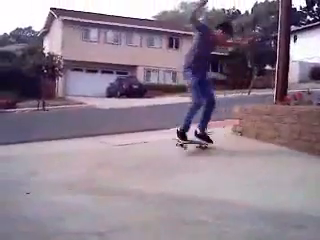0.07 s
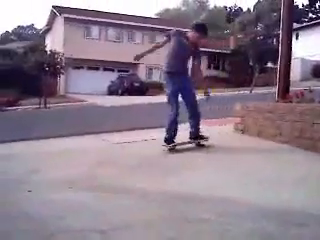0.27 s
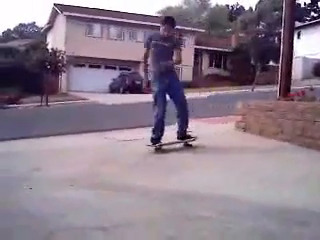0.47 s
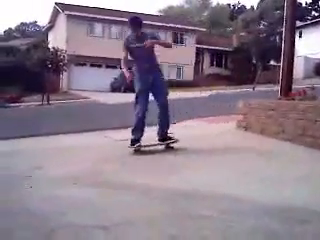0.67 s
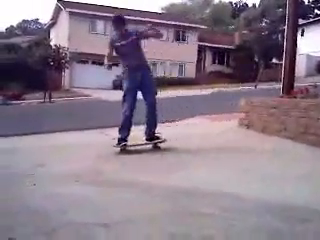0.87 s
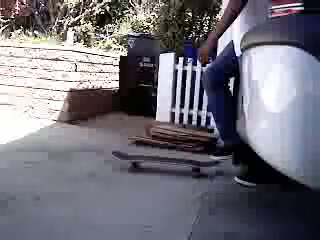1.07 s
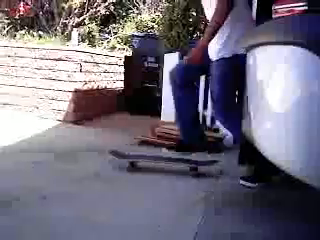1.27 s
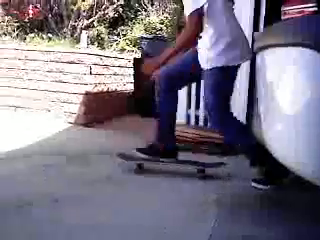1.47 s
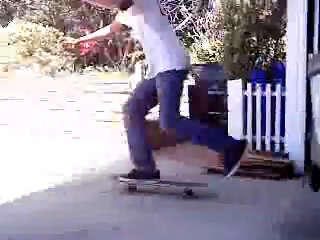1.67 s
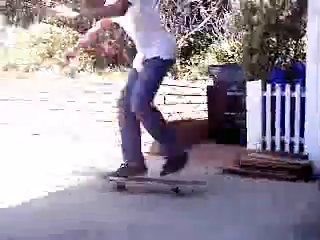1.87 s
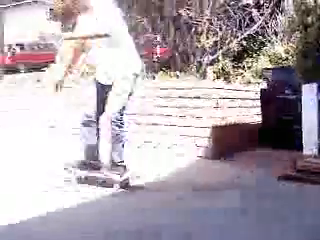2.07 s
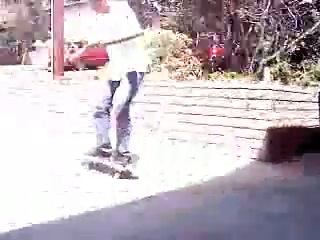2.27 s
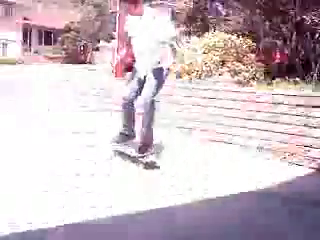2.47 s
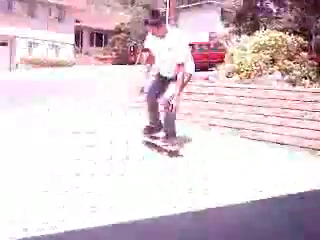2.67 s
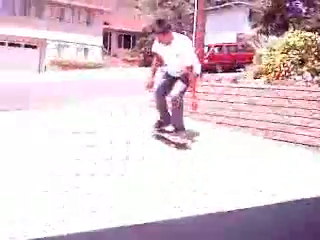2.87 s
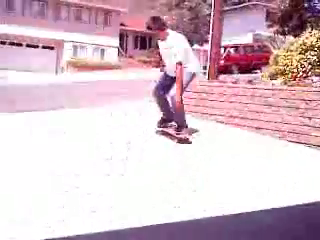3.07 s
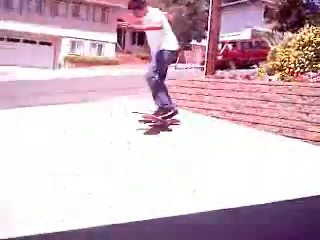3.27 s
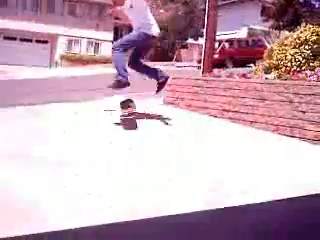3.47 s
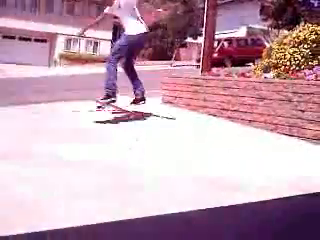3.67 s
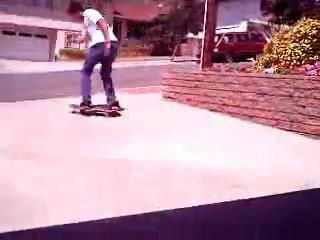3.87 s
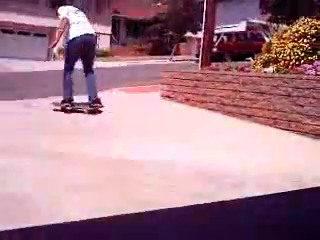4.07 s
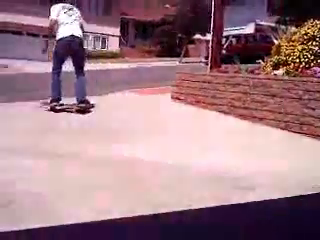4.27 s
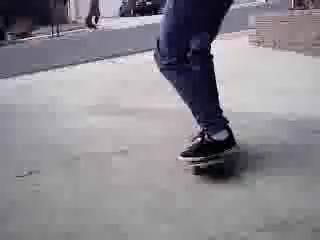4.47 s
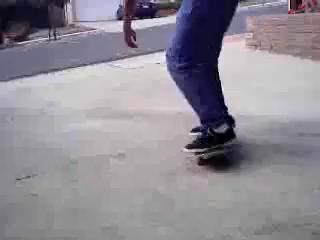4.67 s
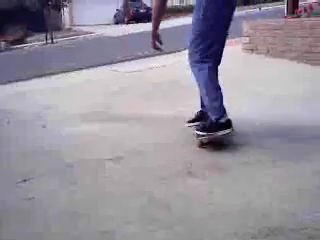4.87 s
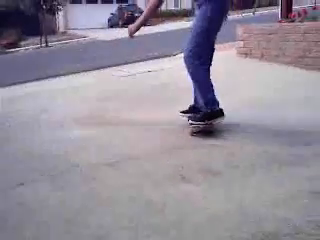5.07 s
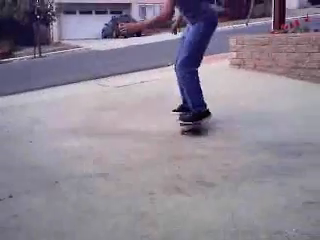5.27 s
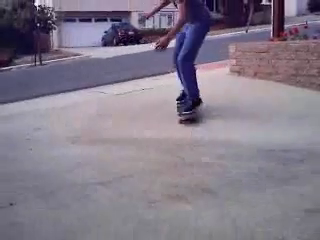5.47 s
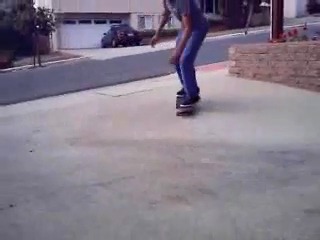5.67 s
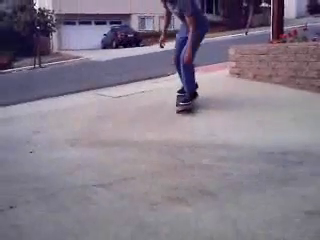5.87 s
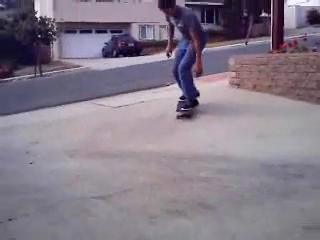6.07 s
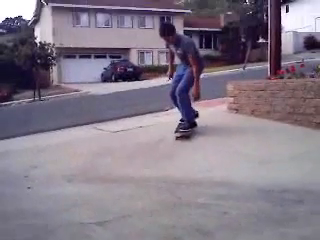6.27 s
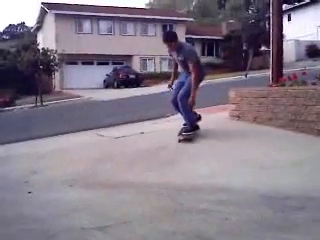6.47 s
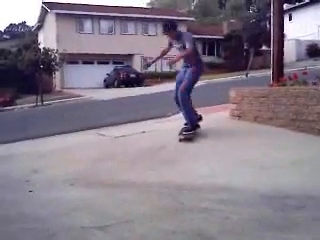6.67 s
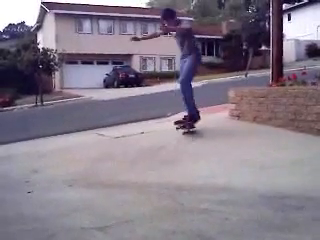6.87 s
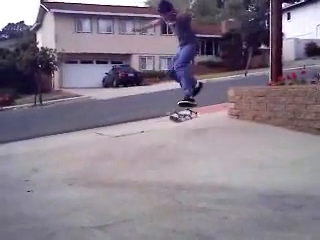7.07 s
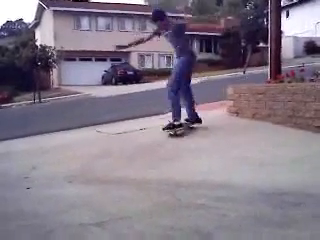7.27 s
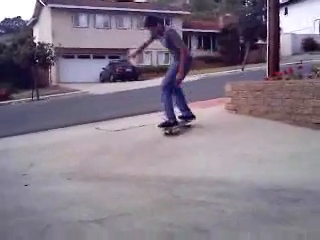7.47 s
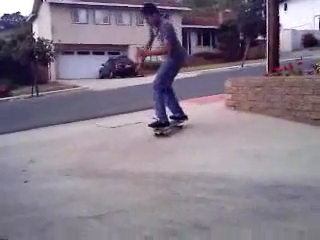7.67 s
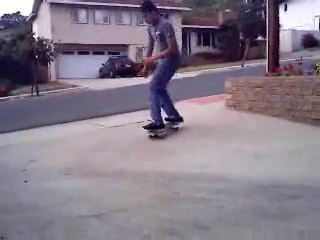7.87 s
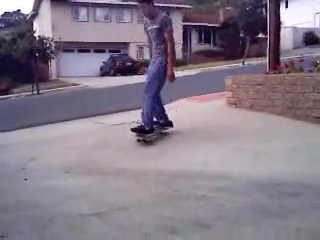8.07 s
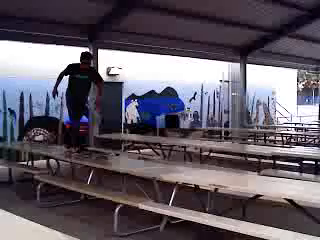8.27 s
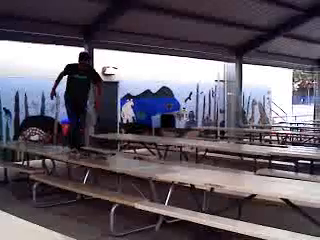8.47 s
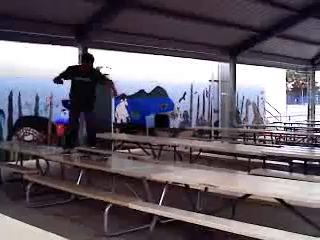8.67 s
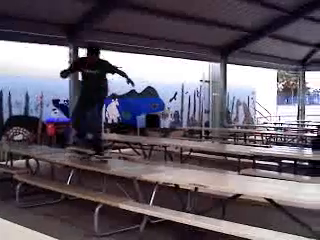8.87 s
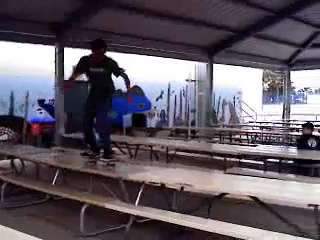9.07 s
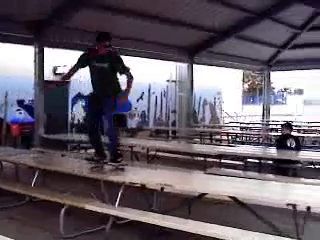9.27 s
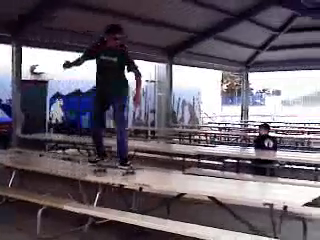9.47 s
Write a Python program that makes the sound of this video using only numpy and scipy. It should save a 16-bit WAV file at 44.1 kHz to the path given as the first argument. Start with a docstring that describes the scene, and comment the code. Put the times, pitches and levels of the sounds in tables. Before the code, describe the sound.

Hollow wooden skateboard clacks punctuate gritty wheel rumble outdoors; a shoe chirps once, wind buffets, and the sound freezes and stutters three times.

```python
"""Skateboards roll, pop and land on concrete drives and on a table top.
Grit under the wheels is random excitation that drives the resonances of deck, wheels and trucks.
Blows and scuffs ring those resonances as dying bursts; a shoe chirps and hisses on the grip tape.
A lumpy breeze lies behind, and peaks overload a narrow-band channel.
Three times the sound nearly stops, then stutters: one short passage starts over several times."""
import sys
import numpy as np
from scipy.fft import rfft, irfft, next_fast_len
from scipy.io import wavfile
from scipy.ndimage import uniform_filter1d, map_coordinates

SR = 44100
rng = np.random.default_rng(int(sys.argv[2]) if len(sys.argv) > 2 else 0)


def waveform_to_disk(signal):
    """Save audio, clipped to [-1, 1], as 16-bit WAV at the path in sys.argv[1]."""
    frames = np.transpose(np.atleast_2d(signal))
    scaled = np.clip(frames, -1, 1) * 32767
    samples = np.round(scaled).astype(np.int16)
    wavfile.write(sys.argv[1], SR, samples)


N = 419391


def amp(db):
    """Decibel law: level to amplitude ratio."""
    return 10 ** (np.asarray(db) / 20)


def unit(x):
    """Normalisation to a root-mean-square of one."""
    return x / np.sqrt(np.mean(x ** 2) + 1e-20)


def curves(rows):
    """Linear interpolation: one value per sample for each column after the time."""
    s, *columns = np.transpose(rows)
    return [np.interp(np.arange(N) / SR, s, column) for column in columns]


def wobble(rate):
    """Slow random modulation: a smooth curve through `rate` random knots a second."""
    knots = rng.standard_normal(int(N * rate / SR) + 4)
    return map_coordinates(knots, [np.arange(N) * rate / SR])


def swells(rows):
    """Gaussian envelopes, summed, from rows of (t/s, peak level/dB, half length/s)."""
    t = np.arange(N) / SR
    return sum(amp(db) * np.exp(-((t - s) / half) ** 2 / 2) for s, db, half in rows)


def filtered(x, response):
    """Linear filtering: the spectrum of x times a response that is a function of frequency."""
    m = next_fast_len(len(x) + 8192)  # padding leaves room for the ringing
    return irfft(rfft(x, m) * response(np.fft.rfftfreq(m, 1 / SR)), m)[:len(x)]


def colour(points):
    """Spectral shaping: gain through (f/Hz, level/dB) points on a logarithmic axis."""
    hz, db = np.transpose(points)
    return lambda f: amp(np.interp(np.log(f + 1), np.log(hz + 1), db))


# rolling levels over time; lists break at contacts, splices and sudden changes of level:
# t/s, wheels level/dB, then levels over the wheels: drone level/dB, deck level/dB, trucks level/dB
ROLLING_LEVELS = [
    [(0.0, -35.5, -4, -3, -6), (0.064, -38, 2, -1, -10), (0.13, -39, -4, -3, -7)],
    [(0.32, -36.5, -2.5, -1, -4.5), (0.432, -44, -1.5, -3.5, -2.5), (0.692, -37, -2, -1, -3.5),
     (1.026, -34, -6.5, -6.5, -3), (1.05, -44, -17, 8, 4)],
    [(1.07, -37, -8, -19, -3), (1.228, -36, -2.5, -3, -5.5), (1.535, -37, -3, -5.5, -3.5)],
    [(1.57, -27, -2, -2, -2.5), (1.612, -25.5, -9, -3, 4.5), (1.666, -24, 1.5, 4, -5.5),
     (1.864, -21.5, -1.5, -1.5, -4.5), (1.97, -17.5, -12, -11, 2.5)],
    [(1.99, -22, -26, 1, -17), (2.012, -12.5, -8, -2, -0.5), (2.04, -14, -9.5, 1.5, -4),
     (2.064, -14, -2.5, 1, -6), (2.12, -20.5, -3, 5, -7.5), (2.18, -20, -1.5, 6, -4.5),
     (2.225, -20.5, -7, 9, 0), (2.276, -18.5, -8.5, 3.5, -2.5), (2.36, -23, 0.5, 3, -1.5),
     (2.405, -17.5, 0, 3, -6), (2.44, -23.5, 5, 5.5, -1.5), (2.478, -25, 4, 6.5, -7.5),
     (2.52, -26, -9, 5, 1), (2.56, -27.5, -11, -12, 6.5), (2.668, -21.5, -5, 1.5, -1),
     (2.776, -28, 2.5, 1, -4.5), (2.826, -21, 3.5, -5, -7.5), (2.858, -26.5, 4.5, 1, -6.5),
     (3.0, -30, 6, 2, -4), (3.07, -31, 7.5, 1.5, -3.5), (3.23, -34, 4, 1, -4.5), (3.33, -38.5, 4.5, -2, -4)],
    [(3.57, -34, -3, -2.5, -5), (3.658, -35.5, -1, -5, -6.5), (3.68, -34.5, -17, -13, -6)],
    [(3.95, -36.5, -5, -4, -3.5), (3.978, -43.5, -2, -1, -6), (4.194, -42.5, 6, 1, -6),
     (4.276, -33, 2.5, 1.5, -4.5), (4.51, -44.5, 3.5, 7, -4)],
    [(4.644, -16.5, -17, -5, 0), (4.668, -19.5, -20, -11, 1.5), (4.69, -14.5, -8, -15, -5)],
    [(4.71, -18.5, -4.5, -16, -1), (4.77, -21, -6, -1, -3.5), (4.82, -22.5, 0, -4, -7),
     (4.84, -24.5, 6.5, 2.5, -1.5), (4.95, -18.5, -7, -5.5, -5.5), (5.0, -22, 1, -0.5, -6),
     (5.05, -22, 1.5, 7.5, -5), (5.11, -24, -5, 2, -4), (5.17, -17.5, -3, -6, -7),
     (5.34, -25.5, 2, 5.5, -9), (5.51, -21.5, -14, -1.5, -11.5), (5.57, -27, 3, 2.5, -5.5),
     (5.61, -23, -13, -10, -2.5), (5.83, -28.5, 3.5, -0.5, -9), (6.0, -37.5, 2, -5, -3.5),
     (6.21, -31.5, 2.5, -5, -4.5), (6.4, -37, 3.5, -8.5, -9), (6.75, -36, -4.5, -3.5, -8.5),
     (6.78, -38.5, 1.5, -9, -9.5), (7.0, -36.5, -2, -1, 0.5)],
    [(7.12, -33, -6, -8, -7), (7.214, -44, 4, -5, -1), (7.24, -39, -1, 10, -3)],
    [(7.48, -43, -0.5, 0, -1), (7.662, -45, -6.5, -7, -5.5), (8.012, -38.5, 7, -3, -8),
     (8.12, -33.5, 0.5, -3, -4), (8.222, -37, -12, -10, -4.5), (8.29, -38, -3, -3, -4)],
    [(8.37, -40.5, -3, 7.5, -2.5), (8.68, -33, 4.5, 5.5, -8.5), (8.762, -34, -2, 6, -3.5),
     (8.788, -33, 0, 8, -7), (8.915, -34, 2, 4, -4), (8.93, -26, -2, 1, -3.5), (8.964, -21.5, -5, 1, -6),
     (9.004, -27, 5, 6, 0), (9.056, -23.5, -4, 3, -7), (9.12, -22, 3.5, 2.5, -6.5),
     (9.156, -18.5, 1.5, 1, -4), (9.2, -19, 5, 5, -5), (9.25, -21.5, 0, 1.5, -4.5),
     (9.36, -21, 0, 1.5, -6.5), (9.39, -21.5, 1, 10, -7), (9.5, -20.5, -1, -1, -7.5)],
]
# slowest bending of the plywood: f/Hz, width/Hz, relative level/dB
DRONE_MODES = [(141.6, 42.5, -7), (206.7, 49.6, 1.5), (218.7, 38.2, 0)]
# bending of the plywood: f/Hz, width/Hz, relative level/dB
DECK_MODES = [(262, 57.3, -3), (327.8, 39, 0), (385.3, 14, -2), (425.6, 38, -6)]
# wheels and short deck modes: f/Hz, width/Hz, relative level/dB
WHEEL_MODES = [(495.3, 52, -0.5), (557.8, 28, 3), (641.4, 51, 0), (755.6, 51.6, 0), (837, 75.6, -2),
               (963, 68, -4)]
# axles and bolts: f/Hz, width/Hz, relative level/dB
TRUCK_MODES = [(1053.4, 56.4, 3.5), (1314, 236, -1.5), (1431, 49.5, 5.5), (1540, 290, -4), (1750, 68, -1.5),
               (1822, 140, -7.5)]


def rolling():
    """Forced vibration: one stream of grit drives drone, deck, wheels and trucks."""
    wheels_db, drone_db, deck_db, trucks_db = curves(np.concatenate(ROLLING_LEVELS))
    stones = grit(6000, spread_db=0.55) * amp(0.88 * wobble(25))
    parts = [(drone_db, DRONE_MODES), (deck_db, DECK_MODES), (0, WHEEL_MODES), (trucks_db, TRUCK_MODES)]
    board = 0
    for over_wheels_db, table in parts:
        level = amp(wheels_db + over_wheels_db + 0.44 * wobble(12))
        board = board + level * swaying(stones, table)
    return board + surface_hiss(stones, wheels_db + trucks_db)


def grit(rate, spread_db):
    """Impulse noise: stones push at random, `rate` a second, with very unequal strength."""
    chance, size, push = rng.random(N), rng.exponential(size=N), rng.standard_normal(N)
    return (chance < rate / SR) * amp(spread_db * size) * push


SWAY_DB, SWAY_RATE = .7, 10  # depth of the sway; random knots a second


def swaying(stones, table):
    """Modal superposition: each mode swells a little on its own as the load shifts."""
    total = 0
    for k, mode in enumerate(table):
        ring = filtered(stones, modes([mode]))
        total = total + (-1) ** k * amp(SWAY_DB * wobble(SWAY_RATE)) * ring
    return unit(total)


WOODY_HZ = 2120  # above this the board radiates little


def modes(table):
    """Damped resonance: the causal response of a set of modes, weakened above WOODY_HZ."""
    def response(f):
        total = 0
        for k, (centre, width, db) in enumerate(table):
            resonance = 1j * f * width / (centre * centre - f * f + 1j * f * width)
            total = total + (-1) ** k * amp(db) * resonance  # alternating phase
        return total / (1 - (f / WOODY_HZ) ** 2 + 1.2j * f / WOODY_HZ)
    return response


# colour of the hiss of grit, also used for the crack of a contact: f/Hz, relative level/dB
GRIT_COLOUR = [(1200, -33.5), (1900, -3), (2400, -1.5), (3000, -0.5), (3800, -3), (6000, -37)]
# a shoe hisses along the grip tape: t/s, peak level/dB, half length/s
SHOE_DRAGS = [(1.565, -31, 0.013), (3.345, -35.5, 0.0036), (3.501, -27, 0.013), (6.95, -43, 0.052),
              (7.1, -49, 0.022)]
HISS_DB, STREET_DB = -15.5, -53  # grit hiss relative to the trucks; steady hiss of the street


def surface_hiss(stones, rattle_db):
    """Friction noise: hiss that follows the rattle of the trucks, over a steady street hiss."""
    hiss = unit(filtered(stones + 0.26 * rng.standard_normal(N), colour(GRIT_COLOUR)))
    level = np.hypot(amp(rattle_db + HISS_DB), amp(STREET_DB))  # powers add
    return (level + swells(SHOE_DRAGS)) * hiss


# blows on the board: t/s, relative level/dB, strongest ring f/Hz, sharpness level/dB, t60/s
BOARD_BLOWS = [(.172, 4.5, 908, -5, 0.011), (.178, -4.5, 530, -4, 0.013), (.183, -16, 645, 13, 0.015),
               (.211, -4, 1030, -10, 0.036), (.2205, -3.5, 1410, 2.5, 0.018), (.228, -14, 780, 6, 0.033),
               (.237, -4.5, 640, -4, 0.037), (1.979, -10, 1410, 1.5, 0.075), (1.988, -5.5, 733, 3, 0.097),
               (1.996, -14, 1420, 5, 0.037), (2.644, -7, 344, 1.5, 0.058), (2.60, -15.5, 1390, 3, 0.05),
               (2.696, -10.5, 1187, 6.5, 0.018), (3.494, -10, 330, -6, 0.059), (3.501, -13, 330, -3, 0.069),
               (3.7065, -0.5, 290, -0.5, 0.018), (3.715, 1, 930, -12, 0.058), (3.765, -10, 786, -7, 0.097),
               (3.7935, -0.5, 776, 0, 0.05), (3.813, -4, 284, -17, 0.02), (3.8675, -0.5, 643, -7, 0.025),
               (3.876, -8, 265, 0, 0.0078), (4.401, -17.5, 287, -7.5, 0.094), (4.475, -13, 510, -6, 0.018),
               (4.484, -20, 624, 8, 0.022), (4.670, -4, 1080, 1.5, 0.024), (4.677, -11, 298, -12, 0.05),
               (4.686, -6.5, 520, -1.5, .03), (4.708, -21, 1450, 11, 0.022), (4.699, -15, 288, 3, 0.036),
               (4.777, -7.5, 840, -0.5, 0.035), (4.930, -8.5, 860, -8.5, 0.032),
               (5.189, -9, 558, -11, 0.047), (5.591, -19, 900, 3.5, 0.037), (5.605, -15, 665, 1.5, .04),
               (7.026, -16.5, 890, -5, 0.0074), (7.038, -6.5, 1480, 8.5, 0.039),
               (7.047, -18, 803, 9, 0.078), (7.057, -19.5, 316, 0, 0.065), (7.329, 7, 565, -8.5, 0.039),
               (7.352, -8, 554, -0.5, 0.038), (7.358, -5, 554, -12.5, 0.064), (7.37, -14, 554, -10, .05),
               (7.385, -12.5, 640, -2, .03), (7.3915, -4, 264, -3, 0.025), (7.393, -4.5, 554, -1, .03),
               (7.398, -4.5, 550, -6.5, 0.022), (7.408, -9.5, 552, -16, 0.019),
               (8.320, -12.5, 267, -4.5, 0.056), (8.461, -28, 420, -22, 0.02),
               (8.466, -25.5, 450, -10, 0.017), (8.795, -28, 584, -10.5, 0.032),
               (8.926, -25, 574, -6, 0.063), (9.216, -4.5, 515, -37, 0.064), (9.317, -8, 328, -12, 0.093)]
# shoe, tail or wheel scuffing just before or between blows:
# t/s, relative level/dB, strongest ring f/Hz, sharpness level/dB, t60/s
BOARD_SCUFFS = [(.154, -12, 570, -3, 0.11), (.204, -11, 1110, 5, 0.022), (1.245, -33.5, 1144, 13, 0.18),
                (1.542, -20.5, 1180, 2, 0.071), (3.356, -22, 1310, 3, 0.36), (3.484, -23, 328, -9, 0.1),
                (4.6445, -18.5, 1550, 9, 0.12), (4.654, -19.5, 1720, 8, .15), (4.662, -22, 1420, 10, 0.11),
                (7.025, -11.5, 470, 1.5, 0.016), (7.251, -16.5, 1520, -2.5, 0.21),
                (7.272, -21, 520, 0, 0.17), (8.309, -16, 1430, -0.5, 0.089)]


def blows():
    """Impact excitation: hard contacts start with a strike; scuffs start with a weaker one."""
    return contacts(BOARD_BLOWS, strike=13.2) + contacts(BOARD_SCUFFS, strike=7.6)


CRACK_DB, CRACK_GROWS = -12.5, 0.67  # share of the crack; dB gained per dB of sharpness
DECK_DB, WHEELS_DB = -7, 0  # shares in a contact on the wheels
FLAT_DB, FLAT_WHEELS_DB = 3, -4.5  # deck and wheel shares when the deck falls flat


def contacts(table, strike):
    """Free decay: a first touch and a dying rattle ring the modes, beside a crack of noise."""
    out, t = np.zeros(N + SR), np.arange(SR // 4) / SR
    for s, db, ring_hz, sharp_db, t60 in table:
        flat = ring_hz < 400  # a flat fall rings low
        deck_db, wheels_db = (FLAT_DB, FLAT_WHEELS_DB) if flat else (DECK_DB, WHEELS_DB)
        crack_db = CRACK_DB + CRACK_GROWS * sharp_db
        # loose parts and nearby walls leave a weaker, longer tail
        dying = amp(-60 * t / t60) + amp(-13.5 - 60 * t / 0.2)
        noise = rng.standard_normal(len(t))
        push = dying * noise
        push[0] += strike
        parts = [(DRONE_MODES + DECK_MODES, deck_db), (WHEEL_MODES, wheels_db), (TRUCK_MODES, sharp_db)]
        rings = [(filtered(push, modes(struck(modal, ring_hz))), share_db) for modal, share_db in parts]
        crack = (dying + 1.2 * amp(-60 * t / 0.0097)) * filtered(noise, colour(GRIT_COLOUR))
        rings.append((crack, crack_db))
        sound = sum(amp(db + share_db - 8.0) * ring / loudest(ring) for ring, share_db in rings)
        out[round(s * SR):][:len(t)] += sound
    return out[:N]


def struck(modal, ring_hz):
    """Modal participation: the place struck favours the modes near one pitch."""
    return [(centre, width, db + 13 * np.exp(-(np.log(centre / ring_hz) / 0.11) ** 2))
            for centre, width, db in modal]


def loudest(x):
    """Short-time level: the greatest root-mean-square over 300 samples."""
    return np.sqrt(uniform_filter1d(x * x, size=300).max())


# a shoe chirps on the grip tape: t/s, f/Hz, peak level/dB, half length/s
SHOE_SQUEAK = (1.559, 1830, -10, .004)


def squeak():
    """Stick-slip: a short tone with its weaker octave under a Gaussian envelope."""
    s, hz, db, half = SHOE_SQUEAK
    t = np.arange(N) / SR - s
    tone = np.sin(2 * np.pi * hz * t) + amp(-20.5) * np.sin(4 * np.pi * hz * t)
    return amp(db) * np.exp(-(t / half) ** 2 / 2) * tone


# wind on the microphone: t/s, level/dB
BREEZE_LEVEL = [(0, -38), (1.05, -55), (1.06, -38.5), (3.6, -39), (4.2, -55), (4.53, -43.5), (5.3, -55),
                (6.5, -43.5), (8, -51), (8.36, -47), (8.9, -39.5), (9.15, -42.5), (9.5, -42)]
# single gusts: t/s, peak level/dB, half length/s
WIND_PUFFS = [(2.493, -25, 0.02), (2.62, -27, 0.02), (2.7, -26.5, .02), (2.78, -41, 0.04),
              (2.945, -30, 0.018), (3.05, -38, .03), (3.172, -21, 0.023), (3.25, -32, 0.016),
              (3.335, -26, 0.013), (3.42, -32.5, 0.036)]
# colour of the wind: f/Hz, relative level/dB
WIND_COLOUR = [(10, -20.5), (30, -8), (60, -13), (95, -5), (160, -39.5), (400, -91.5)]


def wind():
    """Turbulence noise: low random pressure, a lumpy breeze with some single gusts."""
    level = amp(curves(BREEZE_LEVEL)[0]) + swells(WIND_PUFFS)
    rumble = filtered(rng.standard_normal(N), colour(WIND_COLOUR))
    return level * unit(rumble * amp(5.3 * wobble(12)))


def scene():
    """Superposition: the pressures of all sources add."""
    return (rolling() + blows() + squeak() + wind())[None]


# stutters: near-silence from t/s, first start t/s, further starts t/s, and last the skip ahead t/s
STUTTERS = [(1.0505, 1.0600, 1.0963, 1.1463, 1.1963), (4.519, 4.5233, 4.5463, 4.5963, 4.6463, 4.6963),
            (8.3473, 8.3573, 8.3963, 8.4463, 8.4963)]
# sharp treble ticks, at the splices and as clicks at overloaded peaks: t/s, jump level/dB
TREBLE_TICKS = [(1.0602, -29), (1.0963, -22.5), (1.196, -20.5), (4.5223, -30), (4.5465, -25),
                (4.5964, -1.5), (4.6463, -2.5), (4.6965, -5), (4.574, -20), (4.609, -25), (4.624, -15),
                (4.6505, -18), (4.674, -18), (4.712, -24), (4.7205, -21), (4.7285, -29), (4.7365, -28),
                (2.006, -26), (2.0097, -28), (2.046, -30), (8.3474, -26), (8.3963, -30), (8.4463, -32)]
FADE_S, JUMP_S = .0015, .00012  # blend at a splice; time for a jump to settle


def joined(x):
    """Splicing: after a near-silence each start plays the same passage; step discontinuities tick."""
    out, t = x.copy(), np.arange(N) / SR

    def gate(a, b):
        return np.clip(np.minimum(t - a, b - t) / FADE_S + .5, 0, 1)

    for hush, *starts in STUTTERS:
        out = out * (1 - gate(hush, starts[-1])) + 0.066 * x * gate(hush, starts[0])
        for a, b in zip(starts[:-1], starts[1:]):
            # the passage begins 2 ms before the last start
            delay = round((a - starts[-2] + .002) * SR)
            out = out + gate(a, b) * np.roll(x, delay)
    ticks = sum(amp(db) / 2 * np.sign(s - t) * np.exp(-np.abs(t - s) / JUMP_S) for s, db in TREBLE_TICKS)
    return out + ticks


# faint treble fizz: t/s, peak level/dB, half length/s
FIZZ_SWELLS = [(.18, -49, 0.0077), (.23, -53, 0.019), (2.01, -59.5, 0.032), (2.7, -43, 0.0042),
               (3.712, -44, 0.0064), (3.805, -51, 0.017), (4.56, -51.5, 0.012), (4.595, -47, 0.012),
               (4.645, -42, 0.007), (4.69, -46, 0.016), (4.73, -60, 0.014), (7.055, -52, 0.012),
               (7.333, -46, 0.0055)]
# colour of the fizz: f/Hz, relative level/dB
FIZZ_COLOUR = [(3900, -59), (4300, 1.5), (10500, -7), (11500, -21), (14500, -15.5)]


def fizz():
    """Amplitude-modulated noise: the treble fizzes faintly in short swells."""
    noise = rng.standard_normal(N) * amp(3.3 * wobble(300))
    return swells(FIZZ_SWELLS) * unit(filtered(noise, colour(FIZZ_COLOUR)))


BAND_HZ, TOP_HZ = 3924, 15000  # upper limit of the converter; upper limit of the whole sound
FLOOR, CEILING, KNEE = 1, 0.86, 40  # second clipping below and above; hardness


def record(dry):
    """Saturation and band-limiting: the converter overloads, then the tallest peaks clip again."""
    x = filtered(np.clip(dry[0], -.9, .95), lambda hz: 1 / (1 + (hz / BAND_HZ) ** 60))
    # the zero line sags after loud sound
    x = x - .19 * uniform_filter1d(np.abs(x), size=5300, origin=2600)
    limit = np.where(x > 0, CEILING, FLOOR)
    x = joined(x / (1 + np.abs(x / limit) ** KNEE) ** (1 / KNEE))
    x = x + fizz()
    x = x + amp(-90) * rng.standard_normal(N)  # rounding hiss
    return filtered(x, lambda hz: 1 / (1 + (hz / TOP_HZ) ** 60))[None]


dry = scene()
out = record(dry)
waveform_to_disk(out)
```